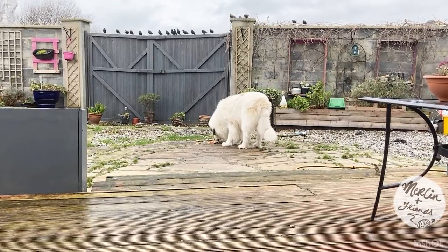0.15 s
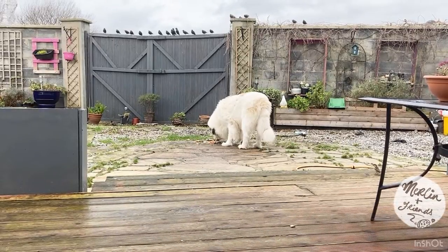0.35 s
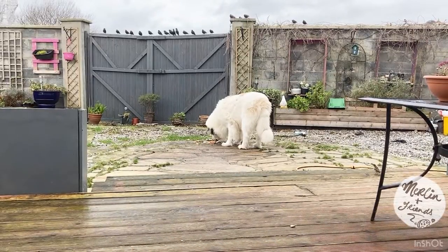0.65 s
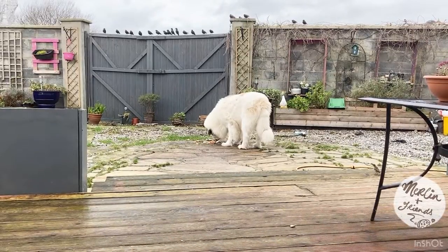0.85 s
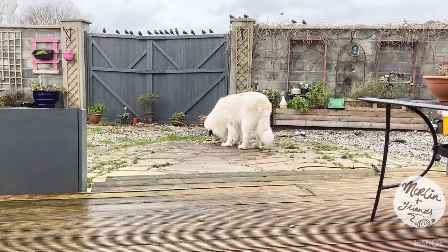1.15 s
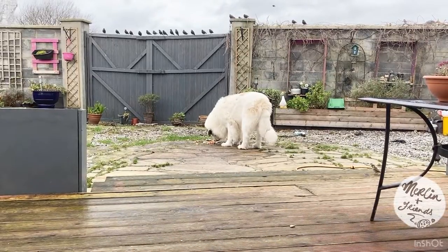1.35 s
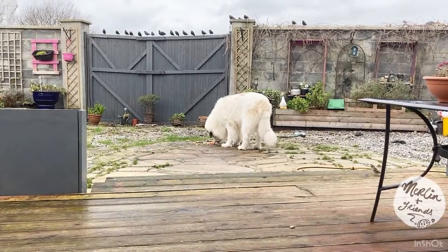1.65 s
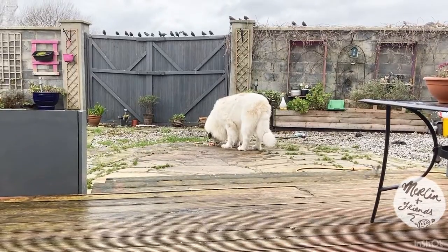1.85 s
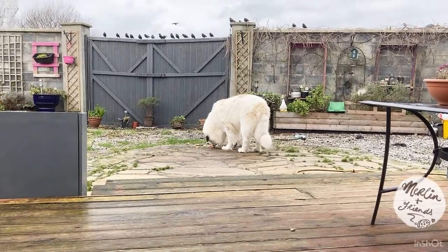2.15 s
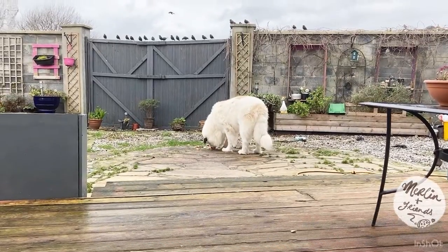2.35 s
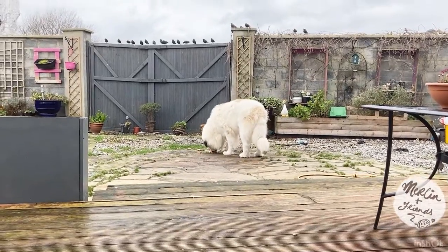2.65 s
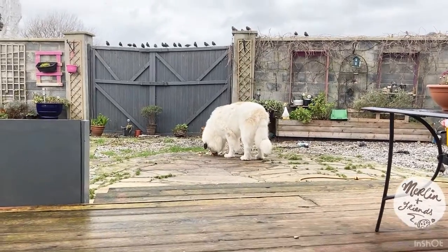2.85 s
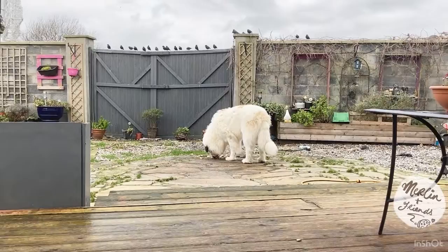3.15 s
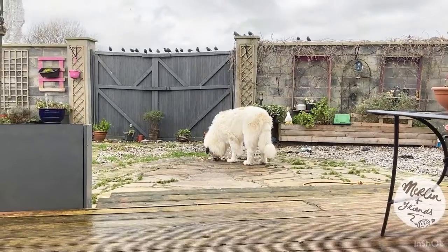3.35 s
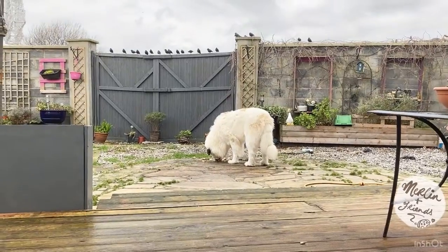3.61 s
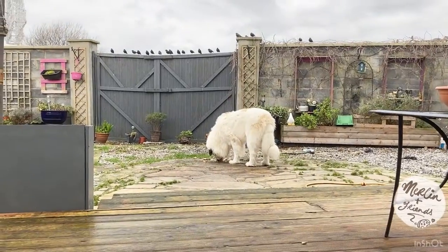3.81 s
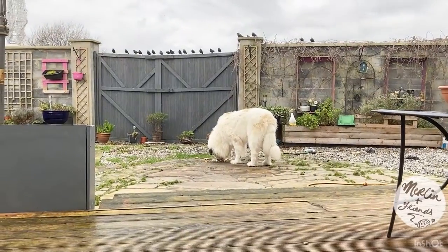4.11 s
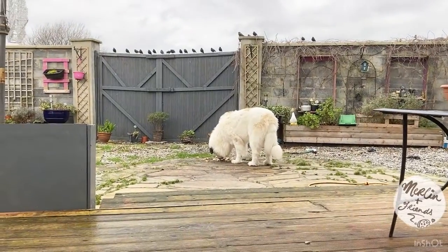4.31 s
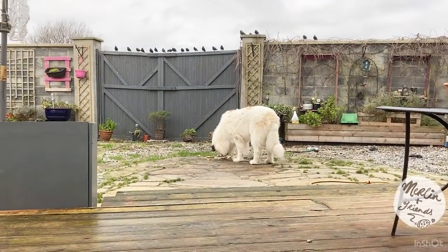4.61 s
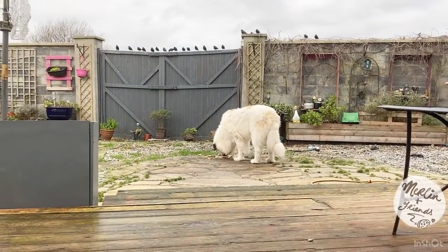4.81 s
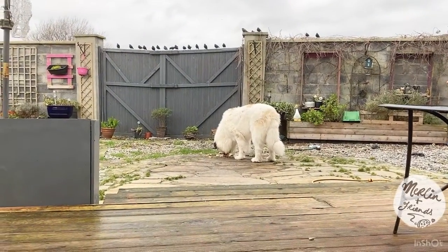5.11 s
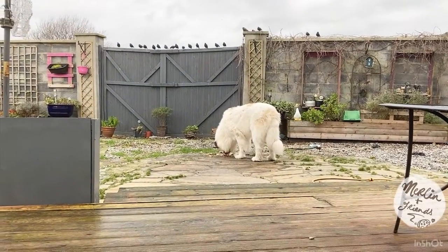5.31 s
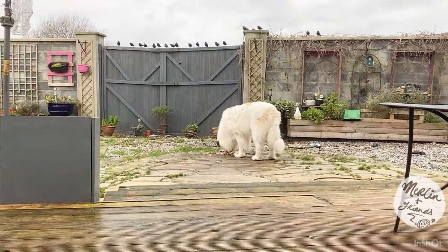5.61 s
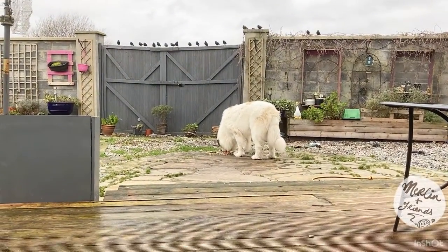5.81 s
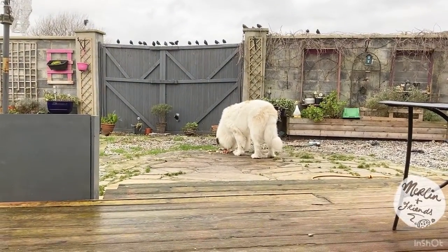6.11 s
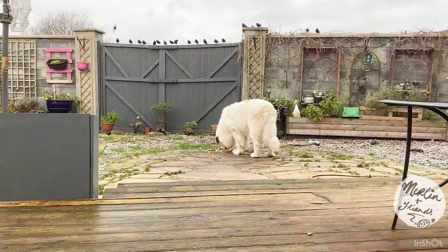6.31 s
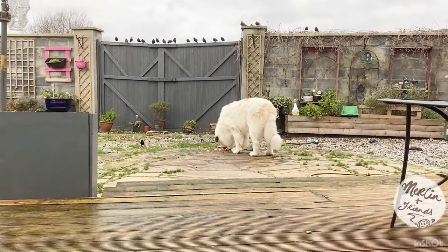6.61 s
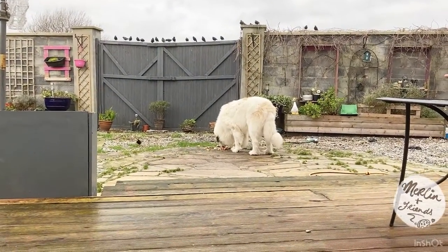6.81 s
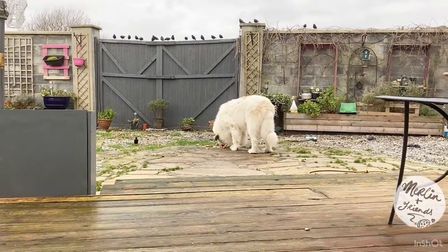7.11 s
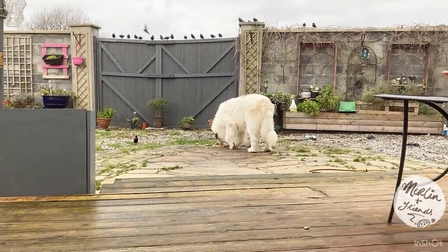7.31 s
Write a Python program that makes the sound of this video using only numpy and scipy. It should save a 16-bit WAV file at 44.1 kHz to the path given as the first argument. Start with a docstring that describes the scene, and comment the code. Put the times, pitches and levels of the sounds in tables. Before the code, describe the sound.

Outdoors, over soft air wash and uneven low rumble, birds perched at some distance give brief rough squawks, bent chirps and rapid dry clicks, with short stone-wall echoes. A long descending whistle opens; the middle is sparser, with muffled wooden ticks and soft bumps nearer the handheld stereo microphones. Later a low whistle overlaps a sharp diving one, a loud rising chirp answers, and chatter thickens to the end.

```python
"""Over a low outdoor rumble, starlings on a garden gate and wall open with arched chirps, harsh squawks and a
long thin whistle. Soft thuds, runs of clicks and dull ticks close by, probably deck boards, follow; later come
a low whistle and a high one that dives and turns. Whistles, chirps and squawks are built from overtones of a
moving pitch, clicks from voice and noise, ticks and thuds from dying tones, the open air from coloured noise.
Stone walls answer the birds, and a phone with two microphones picks it all up."""
import sys
import numpy as np
from scipy import signal
from scipy.fft import rfft, irfft, next_fast_len
from scipy.io import wavfile
from scipy.ndimage import map_coordinates

SR = 44100
rng = np.random.default_rng(int(sys.argv[2]) if len(sys.argv) > 2 else 0)


def to_wav(s):
    """Save 16-bit WAV."""
    ch = np.atleast_2d(s).T  # columns
    pcm = np.round(np.clip(ch, -1, 1) * 32767)  # PCM
    wavfile.write(sys.argv[1], SR, pcm.astype(np.int16))


N = 328986

# Gain for a chirp's tones and a whistle's hoarse tone: strongly weakened up to 7500 Hz, a little less above.
# Each row: frequency in Hz, gain in dB.
BEAK_COLOUR = [(7500, -16), (10000, -13.5), (15000, -11.5)]
# Rough notes pulse and shake: pulses per second, then depth in dB at full roughness
TRILL_HZ, TRILL_DB = 68, 6


def amp(db):
    """Turn decibels into a gain."""
    return 10 ** (np.asarray(db) / 20)


def unit(x):
    """Scale a sound to an average (rms) strength of 1."""
    return x / np.sqrt(np.mean(x ** 2) + 1e-20)


def along(points, hz):
    """Read a curve of (Hz, value) points, with frequency on a log axis."""
    f, v = np.transpose(points)
    return np.interp(np.log(hz + 1), np.log(f + 1), v)


def wobble(rate, n):
    """A smooth random curve of n samples, with rate random points a second."""
    knots = rng.standard_normal(int(n * rate / SR) + 4)
    return map_coordinates(knots, [np.arange(n) * rate / SR])


def filtered(x, response):
    """Multiply the spectrum of x by a response that depends on frequency."""
    n = x.shape[-1]
    m = next_fast_len(n + 2048)
    return irfft(rfft(x, m) * response(np.fft.rfftfreq(m, 1 / SR)), m)[..., :n]


def add(track, s, x):
    """Mix x into the track at time s, in seconds."""
    i = int(np.clip(round(s * SR), 0, N))
    track[i:i + len(x)] += x[:N - i]


def fade(n, rise, fall):
    """A gain curve of n samples that opens and closes softly; rise and fall in seconds."""
    t = np.arange(n) / SR
    ramp = np.minimum(t / rise, t[::-1] / fall)
    return np.sin(np.pi / 2 * np.clip(ramp, 0, 1)) ** 2


def spread(pair):
    """Blend two unrelated signals into a left and right that are partly alike."""
    # Each row: frequency in Hz, likeness of left and right from 0 to 1.
    likeness = [(100, .85), (700, .8), (1500, .3), (4000, .3), (6500, .88), (9000, .98)]
    turn = lambda hz: np.arccos(np.clip(along(likeness, hz), -1, 1)) / 2
    mid, side = filtered(pair, lambda hz: np.array([np.cos(turn(hz)), np.sin(turn(hz))]))
    return np.array([mid + side, mid - side])


def outdoors(air_db=-58.0, rumble_db=-55, lumps_db=2.5):
    """Coloured noise: a distant wash that wavers a little, and a lumpy rumble that swells with the breeze."""
    # Colour of the wash. Each row: frequency in Hz, relative level in dB.
    air_colour = [(40, -21), (120, 1.5), (320, -5), (620, -2.5), (950, -9), (1500, -17), (2400, -17.5),
                  (3500, -24.5), (7000, -32), (15500, -36.5)]
    # Colour of the rumble. Each row: frequency in Hz, relative level in dB.
    rumble_colour = [(15, -37.5), (46, 3), (72, 4), (182, -19.5), (260, -16.5), (400, -69.5)]
    # Swells and lulls of the rumble. Each row: middle in seconds, half width in seconds, change in dB.
    swells = [(.13, 0.06, 18.5), (2.65, 0.17, 7), (5.45, 0.13, 5), (6.451, 0.15, 13.5), (7.1, 0.61, -10)]

    def noise(colour):
        white = rng.standard_normal((2, N))
        return unit(spread(filtered(white, lambda hz: amp(along(colour, hz)))))

    t = np.arange(N) / SR
    swell_db = sum(db * np.exp(-((t - s) / width) ** 2) for s, width, db in swells)
    buffet_db = swell_db + lumps_db * wobble(17, N)
    air = amp(air_db + 1.7 * wobble(6.8, N)) * noise(air_colour)
    return air + amp(buffet_db + rumble_db) * noise(rumble_colour)


def answer(wet_db, walls_db):
    """The garden's reply to one perch: six early wall echoes and a tail that dies at its own pace per pitch."""
    # Each row: frequency in Hz, time in seconds for the tail to die by 60 dB.
    decay = [(300, 0.0973), (2500, 0.55), (7000, 0.4), (15000, 0.2)]
    hz, t, z = signal.stft(rng.standard_normal((2, SR // 2)), SR, nperseg=256)
    tail = signal.istft(z * amp(-60 * t / along(decay, hz)[:, None]), SR, nperseg=256)[1]
    tail = spread(tail * fade(tail.shape[1], 0.0026, 0.046))
    tail = amp(wet_db) * tail / np.linalg.norm(tail[0])
    echoes = (SR * rng.uniform(0.0033, .035, size=6)).astype(int)
    tail[:, echoes] += amp(walls_db) * rng.choice([-1, 1], size=6)
    return tail


def garden(x, wet_db, walls_db, count=14):
    """The birds sit on different perches, so the echoes change from one stretch of time to the next."""
    out, hop = np.zeros((2, N + 2 * SR)), N // count + 1
    for i in range(0, N + hop, hop):
        j = np.arange(max(i - hop, 0), min(i + hop, N))
        part = x[j] * np.cos(np.pi / 2 * (j - i) / hop) ** 2  # neighbouring stretches crossfade
        if part.any():
            echo = signal.fftconvolve(part[None], answer(wet_db, walls_db), axes=1)
            out[:, j[0]:j[0] + echo.shape[1]] += echo
    return x + out[:, :N]


def syrinx(pitch, colour, jitter, flutter, count):
    """A bird's voice: overtones of an unsteady pitch; colour(k, Hz) gives the gain of overtone k."""
    n = len(pitch)
    phase = 2 * np.pi * np.cumsum(pitch * (1 + jitter * wobble(700, n))) / SR
    k = np.arange(1, count + 1)[:, None]
    below_limit = np.clip(10 - 20 * k * pitch / SR, 0, 1)  # drop overtones too high for the sample rate
    waves = np.sin(k * phase + rng.uniform(0, 2 * np.pi, k.shape))
    partials = colour(k, k * pitch) * below_limit * waves
    return unit(partials.sum(0) * amp(flutter * wobble(260, n)))  # flutter in dB


def trill(n):
    """The slightly uneven pulsing of a rough note, between -1 and 1."""
    return np.sin(2 * np.pi * np.cumsum(TRILL_HZ * amp(2.2 * wobble(TRILL_HZ, n))) / SR)


def chirps(second_voice=.9, second_share=0.59):
    """Notes bend through three pitches, brighter while rising; rough ones pulse and add a lower strand."""
    # Each row: start in seconds, length in seconds, first, middle and last pitch in Hz,
    # level in dB before the mix, roughness (0 is smooth, about 1 is very rough).
    notes = [(0, 0.11, 4490, 4195, 4177, -46.5, 0.32), (1.311, 0.089, 4900, 3770, 2990, -65.5, 0.65),
             (1.938, 0.08, 4370, 4630, 4000, -64, 0.8), (2.061, 0.035, 2340, 2090, 2050, -64.5, 0.32),
             (3.044, 0.049, 1920, 2650, 3480, -61.5, 0.56), (3.045, .05, 4220, 5340, 6260, -53, 0.42),
             (3.073, 0.1, 3105, 4350, 3195, -51, 0.42), (3.335, 0.19, 2070, 2187, 2384, -60, 0.27),
             (3.638, 0.12, 6650, 5040, 3470, -65, 0.4), (3.735, 0.053, 4300, 4330, 4280, -62.5, 0.5),
             (4.132, 0.091, 1712, 1940, 2090, -58, 0.7), (4.221, 0.033, 1845, 1840, 1900, -55, 0.69),
             (5.57, 0.061, 3280, 3770, 4570, -56, 0.2), (5.622, 0.052, 3466, 4060, 4770, -35, 0.24),
             (5.671, 0.052, 3840, 4130, 4560, -41, 0.53), (5.654, 0.13, 1638, 2103, 1740, -55.5, 0.72),
             (6.62, 0.046, 2940, 2160, 2010, -57.5, 1.2), (6.719, 0.043, 2910, 1843, 1970, -52.5, 0.57)]
    overtone_db, rising_db = -16.5, 8  # step between overtones; the most a rising pitch adds to it
    fast_rise = 7.3  # octaves per second
    trill_bend = .06  # share of the pitch at full roughness
    out = np.zeros(N)
    for s, length, start, middle, end, db, rough in notes:
        u = np.linspace(0, 1, int(length * SR))
        curve = np.polyfit([0, .5, 1], np.log2([start, middle, end]), 2)
        octaves = np.polyval(curve, u)
        step_db = overtone_db + rising_db * np.tanh(np.gradient(octaves) * SR / fast_rise)
        pulse = rough * trill(len(u))

        def pitch():
            return 2 ** octaves * (1 + trill_bend * rough * (pulse + wobble(110, len(u))))

        def voice(hz):
            colour = lambda k, f: amp(step_db * (k - 1) + along(BEAK_COLOUR, f))
            return syrinx(hz, colour, .07 * rough, 3 * rough, count=4)

        strands = voice(pitch()) + second_share * rough * voice(second_voice * pitch())
        tone = unit(strands * amp(TRILL_DB * pulse))
        add(out, s, amp(db) * tone * fade(len(u), .003 + .02 * rough ** 2, 0.0088))
    return out


LOW_HZ = 2650  # the low resonance, strong in some calls and weak in others


def throat(low_db, beak_hz, beak_db, tilt_db):
    """A bird's resonances, as gain by frequency: the common colour, the low resonance and the beak's."""
    # Common colour of harsh calls and clicks. Each row: frequency in Hz, gain in dB.
    common = [(700, -24.5), (1300, -15), (1850, -13), (2650, -7.5), (3250, -9.5), (4400, -6), (5700, -0.5),
              (6400, -5), (7500, -1.5), (9000, -4), (10500, -8.5), (15000, -11)]
    low_width, beak_width = 0.2, .13  # octaves
    peak = lambda hz, centre, width: np.exp(-(np.log2((hz + 1) / centre) / width) ** 2)

    def gain(hz):
        low = low_db * peak(hz, LOW_HZ, low_width)
        beak = beak_db * peak(hz, beak_hz, beak_width)
        return amp(along(common, hz) + low + beak + tilt_db * np.log2(1 + hz / LOW_HZ))

    return gain


def squawks(crest=0.72, hiss_share=0.25, second_voice=.88, swell_db=20):
    """A low pitch scoops up and sags as the call swells; the beak's resonance moves with it.
    Rough calls start gradually and pulse, and the other side of the syrinx and hiss join in."""
    # Each row: start in seconds, length in seconds, top pitch in Hz, level in dB before the mix,
    # scoop as a share of the pitch, roughness from 0 to 1, low resonance in dB, top beak resonance in Hz.
    calls = [(0, 0.028, 1324, -39, 0.1, 0.73, -1, 7250),
             (0.061, 0.073, 1464, -41.5, 0.16, 0.73, -7.5, 6000),
             (0.606, 0.07, 1238, -49, 0.23, 0.67, -1, 5020),
             (0.686, 0.05, 1295, -37, 0.33, 0.53, -6.5, 5700),
             (1.693, 0.035, 1486, -33.5, 0.021, 0.33, -26, 5840),
             (2.442, 0.068, 1240, -43, 0.14, 0.83, 4, 8740),
             (2.753, 0.042, 1341, -39, 0.34, 0.47, -5.5, 5700),
             (2.781, 0.034, 1275, -41.5, 0.24, 0.68, -22, 7600),
             (3.368, 0.11, 1109, -53.5, 0.081, 0.56, 13, 3420),
             (4.698, 0.084, 1147, -43.5, 0.11, 0.44, 15, 3530),
             (4.855, 0.043, 1403, -37.5, 0.18, 0.14, 3, 7850),
             (5.036, 0.064, 1478, -39, 0.073, 0.42, -8, 5670),
             (5.454, 0.056, 1356, -28, 0.34, .1, -10.5, 8220),
             (5.861, 0.046, 1074, -46, 0.13, 0.55, -6.5, 8190),
             (5.943, 0.035, 1307, -48, 0.13, 0.46, 8, 8210),
             (6.025, 0.054, 1410, -41.5, 0.019, 0.16, 7, 8400),
             (6.042, 0.026, 1288, -36.5, 0.028, 0.2, -16, 7600),
             (6.497, 0.049, 1492, -39, 0.06, 0.32, -13, 7100),
             (6.534, 0.12, 1344, -46.5, 0.071, 0.71, 5.5, 8000),
             (6.965, 0.034, 1261, -40.5, 0.13, 0.56, 0.5, 7540),
             (7.021, 0.055, 1256, -46.5, 0.12, 0.7, 7.5, 5300),
             (7.161, 0.056, 1296, -42, .1, 0.49, 1, 4900), (7.363, 0.045, 1318, -44, .15, 0.51, 6, 5300),
             (7.404, .055, 1380, -43.5, 0.036, 0.53, -6, 6900)]
    clear_beak_db = 10  # the beak resonance of a perfectly clear call
    faint_db, dulling = -31.5, 0.41  # below this level, treble tilt grows by this much for each dB
    out = np.zeros(N)
    for s, length, top, db, scoop, rough, low_db, beak_hz in calls:
        n = int(length * SR)
        u = np.linspace(0, 1, n)
        tilt_db = dulling * min(db - faint_db, 0)
        arch = 1 - scoop * (1 - u / crest) ** 2
        colour = throat(low_db, beak_hz * arch, clear_beak_db * (1 - rough), tilt_db)

        def voice(hz):
            pitch = hz * arch * (1 + .06 * rough * wobble(150, n))
            return syrinx(pitch, lambda k, f: colour(f), .006 + .03 * rough, 1 + 3 * rough, count=14)

        hiss = unit(filtered(rng.standard_normal(n), throat(low_db, beak_hz, 0, tilt_db)))
        call = voice(top) + rough * (voice(second_voice * top) + hiss_share * hiss)
        swell = swell_db * scoop * np.minimum(u / crest, 1)  # the deeper the scoop, the more it swells
        effort = amp(swell + TRILL_DB * rough * trill(n))
        add(out, s, amp(db) * unit(call * effort) * fade(n, .004 + .03 * rough ** 2, 0.014))
    return out


def whistle(course, overtone_db, rasp_db, flutter):
    """A nearly pure gliding tone with a weak octave; a hoarse tone at 1.5 times the pitch grows when pushed."""
    pushed_db = -24.5  # level at which a whistle is fully pushed and turns hoarse
    out, (s, hz, db) = np.zeros(N), np.transpose(course)
    t = np.arange(s[0] - .006, s[-1], 1 / SR)
    pitch = np.interp(t, s, hz)
    gain = amp(np.interp(t, s, db)) * fade(len(t), 0.0067, 0.0016)
    tone = syrinx(pitch, lambda k, f: amp(overtone_db * (k - 1)), jitter=0.003, flutter=flutter, count=2)
    rasp = syrinx(1.5 * pitch, lambda k, f: amp(along(BEAK_COLOUR, f)), jitter=0.043, flutter=3.0, count=1)
    push = gain / amp(pushed_db)
    add(out, t[0], (tone + amp(rasp_db) * push * rasp) * gain)
    return out


def whistles():
    """The two high whistles ring in the garden; the low one has a weaker tail and is less steady."""
    # A long thin whistle swells as it falls. Each row: time in seconds, pitch in Hz, level in dB.
    thin = [(0.02, 8800, -51.5), (0.2, 8320, -35), (0.304, 8445, -32), (0.398, 7844, -27.5),
            (0.438, 7530, -34.5), (0.526, 7250, -22), (0.564, 6900, -26), (0.61, 6915, -28),
            (0.7, 6680, -41.5)]
    # A low whistle settles and stops short. Each row: time in seconds, pitch in Hz, level in dB.
    settling = [(4.53, 3170, -67.5), (4.68, 2845, -58.5), (4.695, 2692, -44), (4.81, 2518, -43.5),
                (4.955, 2270, -41.5), (5.03, 2253, -39.5), (5.1, 2222, -39.5), (5.122, 2090, -60)]
    # One dives, turns and is pushed again at its end. Each row: time in seconds, pitch in Hz, level in dB.
    scooped = [(5.034, 9350, -32.5), (5.101, 9070, -20.5), (5.141, 7860, -27), (5.181, 6270, -55),
               (5.24, 5870, -47.5), (5.321, 6470, -39.5), (5.378, 6610, -42), (5.398, 6665, -25.5),
               (5.43, 6290, -44)]
    high = (whistle(thin, overtone_db=-13.5, rasp_db=-29.5, flutter=0.4)
            + whistle(scooped, overtone_db=-8.5, rasp_db=-44, flutter=0.41))
    low = whistle(settling, overtone_db=-27, rasp_db=-49, flutter=3.8)
    return garden(high, wet_db=-7.0, walls_db=-32.0) + garden(low, wet_db=-12.5, walls_db=-13)


def bump(t, hz=170, t60=.19, sag_time=0.007):
    """A low tone that dies as its pitch sinks, from 1.5 times hz to half of it."""
    sinking = np.sin(2 * np.pi * np.cumsum(hz * (0.5 + np.exp(-t / sag_time))) / SR)
    return sinking * amp(-60 * t / t60) * fade(len(t), 0.002, 0.0072)


def thuds():
    """Soft low bumps close by, each a sinking tone."""
    # Each row: start in seconds, level in dB.
    bumps = [(1.173, -40), (3.405, -39), (4.441, -36.5)]
    out = np.zeros(N)
    for s, db in bumps:
        add(out, s, amp(db) * bump(np.arange(SR // 20) / SR))
    return out


def rattles(click_t60=0.028, click_hz=1560, sag_per_s=14):
    """Each click is a snap of noise and a tiny burst of voice whose pitch drops; the beak stays nearly shut."""
    # Each row: start in seconds, length in seconds, clicks per second, level in dB before lift and mix.
    runs = [(1.533, .03, 93, -41.5), (1.62, .03, 93, -37), (1.736, .1, 68, -38.5), (1.848, .05, 65, -43),
            (2.058, .03, 77, -49), (2.374, .018, 87, -40.5), (4.977, .03, 99, -39), (5.918, .05, 69, -37.5),
            (6.326, .03, 88, -39), (6.435, .018, 89, -41.5), (6.949, .02, 99, -37.5),
            (7.323, .05, 100, -45)]
    snap_share = .42  # noise in a click; the rest is voice
    lift_db = 9.5
    out, t = np.zeros(N), np.arange(SR // 50) / SR
    for s, length, rate, db in runs:
        for delay in np.arange(0, length, 1 / rate):
            colour = throat(low_db=3, beak_hz=7200 * amp(rng.normal()), beak_db=5, tilt_db=0)
            snap = unit(filtered(rng.standard_normal(len(t)), colour))
            pitch = click_hz * rng.normal(1, .045) * np.exp(-sag_per_s * t)
            voice = syrinx(pitch, lambda k, f: colour(f), jitter=0.022, flutter=4, count=10)
            level = db + lift_db + rng.normal() - 60 * t / click_t60
            blend = snap_share * snap + (1 - snap_share) * voice
            click = amp(level) * blend * fade(len(t), 0.0047, 0.0018)
            add(out, s + delay, click)
            if not delay:  # a softer click comes just ahead of the run
                add(out, s - 1 / rate, amp(-14) * click)
    return out


def ticks(bend=4.47, bend_time=0.00062, thump_db=-13):
    """Bending waves in a board: the highs arrive first, then a short dull ring and a sinking thump."""
    # Each row: start in seconds, peak of the ring in dB.
    knocks = [(2.535, -35), (2.67, -38), (2.704, -36.5), (2.732, -40), (2.81, -32.5), (2.851, -37.5),
              (2.906, -39.5), (2.967, -35.5), (3.191, -40.5), (3.322, -37), (3.401, -41.5), (3.817, -42.5),
              (4.442, -43.5), (4.641, -32.5), (4.683, -40), (4.847, -40)]
    # Ringing tones of the board. Each row: typical pitch in Hz, typical level in dB,
    # time in seconds to die by 60 dB.
    board = [(479, 3, 0.012), (605, -12.5, 0.033), (990, -6, 0.015)]
    out, t = np.zeros(N), np.arange(SR // 20) / SR
    phase = 2 * np.pi * np.cumsum(1 + bend * np.exp(-t / bend_time)) / SR  # every tone starts high
    thump = amp(thump_db) * bump(t)
    for s, db in knocks:
        ring = np.zeros(len(t))
        for hz, level, t60 in board:
            dying = amp(level + rng.normal(0, 2.5) - 60 * t / t60)
            ring += dying * np.sin(hz * rng.normal(1, .04) * phase)
        ring = ring * fade(len(t), 0.0054, .01)
        add(out, s, amp(db) * (ring / np.abs(ring).max() + thump))
    return out


def scene():
    """Mix the birds across the garden, the ticks and thuds near by, and the open air."""
    return (whistles()
            + amp(5.5) * garden(chirps(), wet_db=-7.0, walls_db=-15.5)
            + amp(-1.5) * garden(squawks(), wet_db=0.5, walls_db=-28.5)
            + amp(1) * garden(rattles(), wet_db=0, walls_db=-36.5)
            + ticks() + thuds() + outdoors())


def record(dry):
    """Two microphones differ in phase and slightly in level; the highest treble is cut off."""
    # Each row: frequency in Hz, lead of the left microphone over the right in radians.
    phase_lead = [(0, 0), (690, -.8), (1100, 1.7), (5000, 1.8), (5700, 2.7), (7000, 0), (9000, -3.0),
                  (14400, -10.4), (16400, -12.9)]
    top_hz, level_gap_db = 15900, 0.59  # the left is the louder
    half = np.array([[.5], [-.5]])  # half of each difference goes to either side
    edge = lambda hz: np.clip((top_hz - hz) / 600 + .5, 0, 1) ** 2
    turn = lambda hz: np.exp(1j * half * along(phase_lead, hz))
    return filtered(dry, lambda hz: amp(level_gap_db * half) * turn(hz) * edge(hz))


dry = scene()
out = record(dry)
to_wav(out)
```